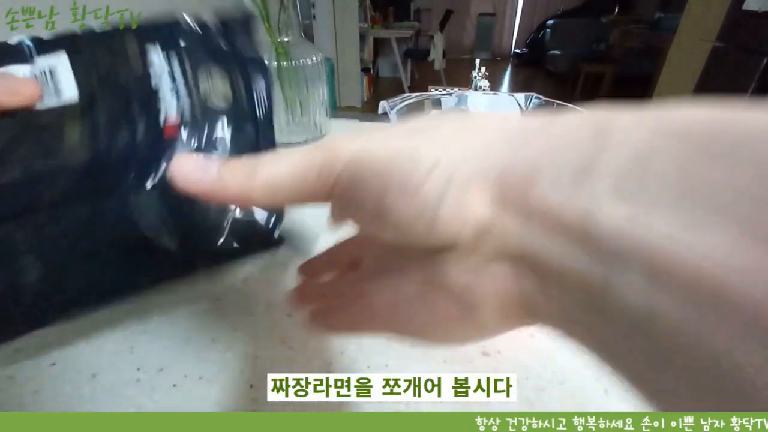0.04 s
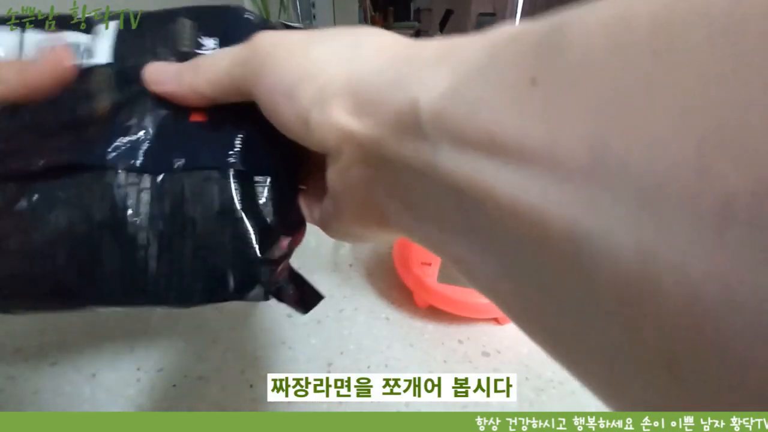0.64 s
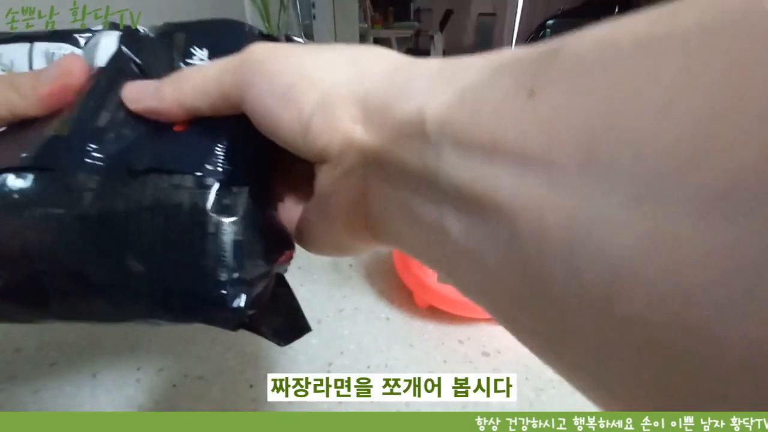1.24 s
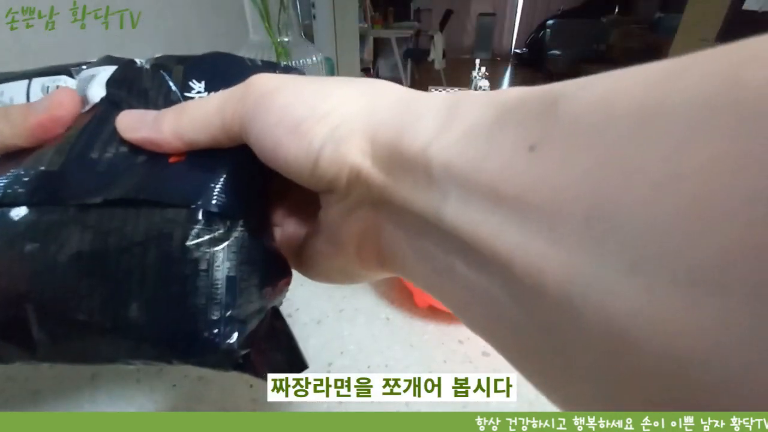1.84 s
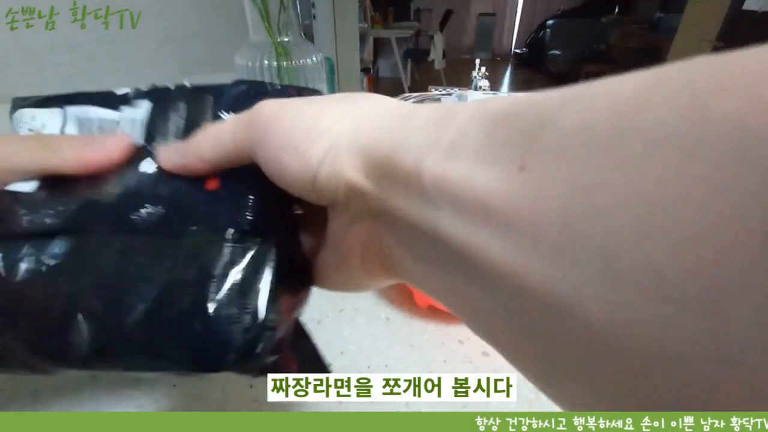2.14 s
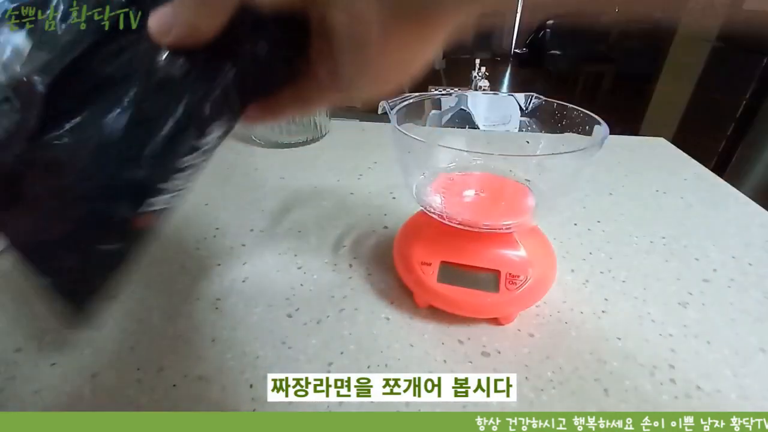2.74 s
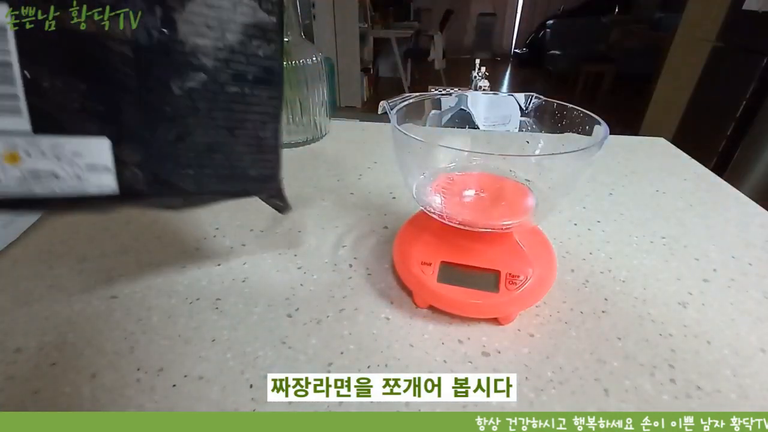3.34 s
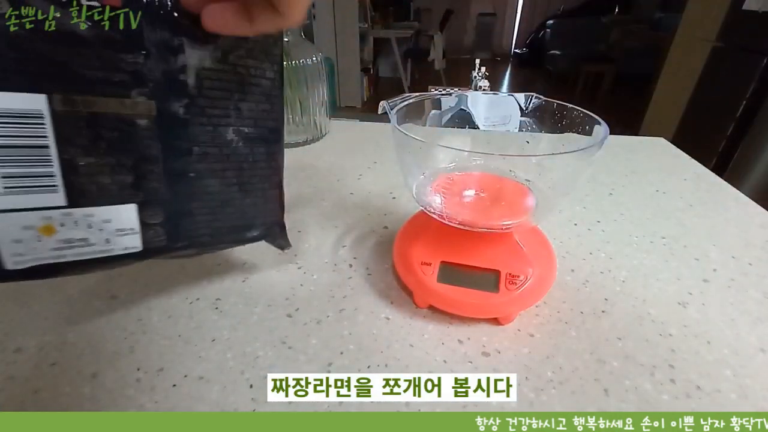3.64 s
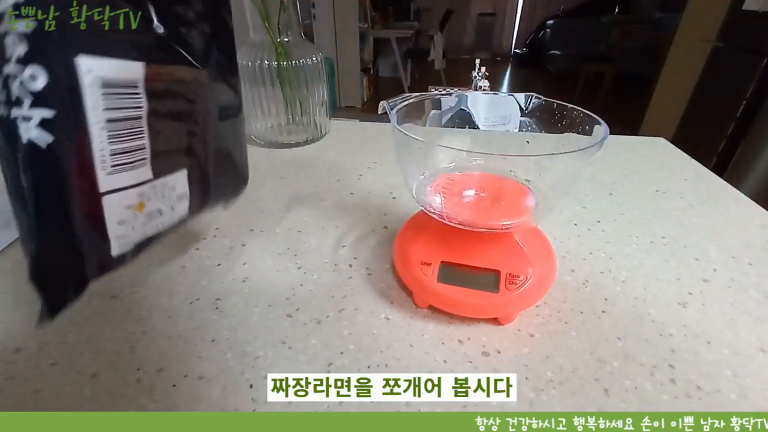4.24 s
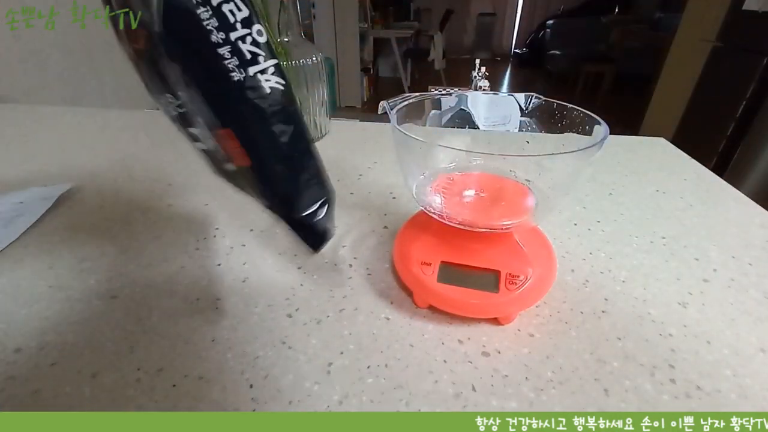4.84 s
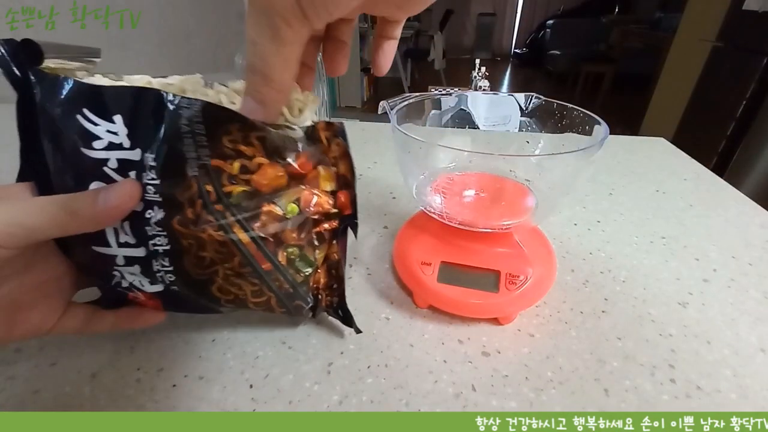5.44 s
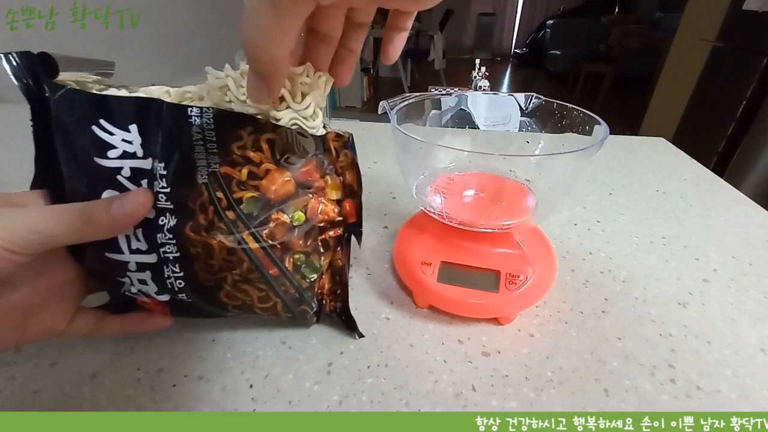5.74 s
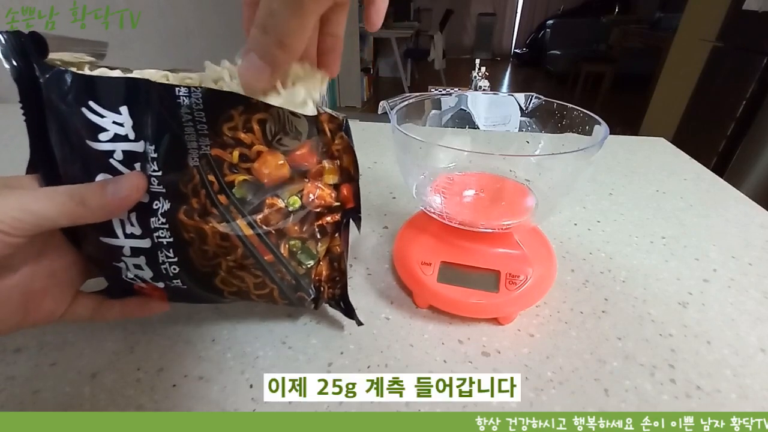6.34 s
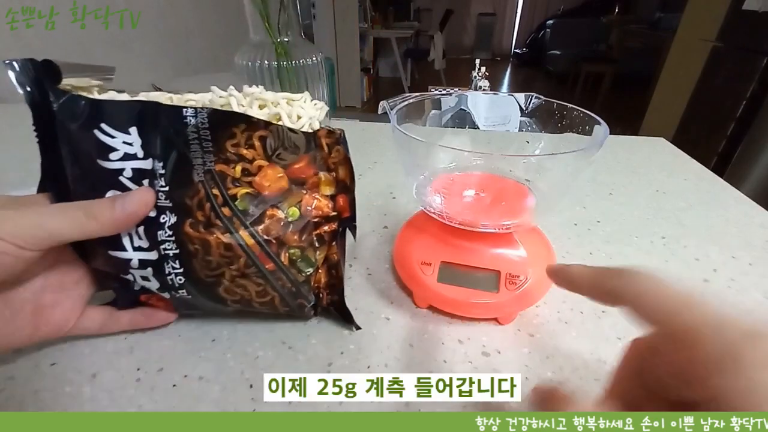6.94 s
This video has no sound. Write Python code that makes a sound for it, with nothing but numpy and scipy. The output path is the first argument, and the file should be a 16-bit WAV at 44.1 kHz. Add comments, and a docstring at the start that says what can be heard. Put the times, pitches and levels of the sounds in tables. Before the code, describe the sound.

Close, sharp plastic crackling and dull knocks as dry noodles are crushed in their packet, followed by faint rustling of picking fingers.

```python
"""Crushing a packet of dry noodles

Close up, hands squeeze a plastic packet to break the noodle block inside, then turn it over. Creases in
the film buckle with single snaps over a dense rustle, and the block gives way with dull knocks. Then the
scene changes: fingers pick softly at the noodles in the open packet. A small, quiet kitchen answers."""
import sys
import numpy as np
from scipy import signal
from scipy.fft import rfft, irfft
from scipy.io import wavfile
from scipy.ndimage import uniform_filter1d

SR = 44100
rng = np.random.default_rng(int(sys.argv[2]) if len(sys.argv) > 2 else 0)


def file_out(sig):
    """Save sig as 16-bit WAV at sys.argv[1]."""
    # one column per channel
    cols = np.atleast_2d(sig).T
    # limit, then scale
    lim = np.clip(cols, -1, 1)
    pcm = np.round(lim * 32767).astype(np.int16)
    wavfile.write(sys.argv[1], SR, pcm)


N = 307818
TIME = np.arange(N) / SR
SNAP_TIME = (np.arange(1400) - 132) / SR   # seconds around the instant a crease flips
SCENE_CHANGE_S = 5.087   # crushing ends, picking begins


def from_db(db):
    return 10 ** (np.asarray(db) / 20)


def band(x, low_hz, high_hz, order=2):
    """Butterworth band-pass."""
    edges_hz = [low_hz, min(high_hz, SR / 2.1)]
    return signal.sosfilt(signal.butter(order, edges_hz, "band", fs=SR, output="sos"), x)


def colour(x, peaks):
    """A chain of resonances and dips."""
    for hz, width_hz, db in peaks:
        x = x + (from_db(db) - 1) * signal.lfilter(*signal.iirpeak(hz, hz / width_hz, fs=SR), x)
    return x


def drift(moves_per_s):
    """A random wander with a spread of about 1."""
    knots = rng.standard_normal(int(moves_per_s * N / SR) + 2)
    return np.interp(TIME * moves_per_s, np.arange(len(knots)), knots)


def add(out, sound, at):
    """Mix a short sound in, starting at a sample."""
    room_left = out[..., max(at, 0):][..., :sound.shape[-1]]
    room_left += sound[..., :room_left.shape[-1]]


def unit_level(x, span_s=.005):
    """Give each short stereo sound the energy of rms 1 held for span_s."""
    return x / np.sqrt(np.mean(np.sum(x ** 2, -1), -1) / (span_s * SR) + 1e-20)[:, None, None]


def stereo_delay(sounds, lag):
    """Each sound reaches the left side lag samples after the right; a negative lag leads."""
    source = np.arange(len(SNAP_TIME)) - np.maximum(lag[:, None] * [1, -1], 0)[..., None]
    return np.take_along_axis(sounds, np.maximum(source, 0), -1) * (source >= 0)


def buckle(count, spike, fall_s, flutter_db, width):
    """A crease creeps, flips, shivers and flutters out; the shiver differs between left and right."""
    noise = rng.standard_normal((count, 3, len(SNAP_TIME)))
    shiver = noise[:, :1] + width * noise[:, 1:]
    flip = spike * rng.choice([-1, 1], (count, 1, 1)) * (SNAP_TIME == 0)
    from_flip_s = np.abs(SNAP_TIME)
    creep = .33 * np.exp(-from_flip_s / .0014)
    flutter = from_db(flutter_db) * np.exp(-from_flip_s / .004)
    fall = np.exp(-from_flip_s / (fall_s * from_db(rng.normal(0, 1.5, (count, 1, 1)))))
    return flip + shiver * np.where(SNAP_TIME < 0, creep, fall + flutter)


def film_ring(hz, ring_cycles):
    """Film rings for a few cycles, damped by the hands, and sags in pitch as its tension lets go."""
    t = np.maximum(SNAP_TIME, 0)
    cycles = hz[:, None, None] * t * (1 + .1 * np.exp(-t / .0015))
    swell = (1 - np.exp(-2 * cycles)) * np.exp(-cycles / ring_cycles - t / .0035)
    tone = band(np.sin(2 * np.pi * cycles) * swell, 380, 13000)
    return unit_level(tone * np.ones((2, 1)))


def snap_sounds(facet_hz, ring_db, sharp_db):
    """Three layers per snap: the packet's thump, the flap of a facet of film, the crack of the crease."""
    count = len(facet_hz)
    lag = np.round(rng.normal(3, 3.5, count)).astype(int)
    thump = buckle(count, spike=5.8, fall_s=.0014, flutter_db=-15, width=.62)
    flap = buckle(count, spike=2, fall_s=.0013, flutter_db=-15, width=.6)
    crack = buckle(count, spike=1.6, fall_s=.0012, flutter_db=-17, width=.99)
    thump = band(band(thump, 180, 520, order=1), 38, 670)
    flap = unit_level(band(flap, 500, 3400)) + from_db(ring_db) * film_ring(facet_hz, ring_cycles=4)
    crease_hz = np.exp(rng.uniform(np.log(4200), np.log(14000), count))
    # some creases flip more sharply than others, which lifts the top of the crack
    sharpness = from_db(sharp_db + rng.normal(0, 2.6, (count, 1, 1)))
    crack = crack + sharpness * band(crack, 10000, 19000, order=1)
    crack = unit_level(band(crack, 3800, 19000)) + from_db(-9) * film_ring(crease_hz, ring_cycles=5)
    return np.stack([unit_level(stereo_delay(part, lag)) for part in (thump, flap, crack)], 1)


def grip_levels(attack_s=.012, settle_db_per_s=170):
    """Thump, flap and crack envelopes in dB: each swells as the fingers close, holds, then settles."""
    # the hands squeeze, turn and pick at the packet: t/s, length/s, thump/dB, flap/dB, crack/dB
    grips = [(0, 0.15, -57, -49, -52.5), (0.209, 0.024, -47, -42, -54), (0.282, 0.016, -40, -32, -35.5),
             (0.364, 0.11, -43, -36, -38), (0.573, 0.063, -34.5, -29.5, -30), (0.671, 0.2, -39, -30, -36.5),
             (0.932, 0.045, -36, -29, -31), (1.034, 0.13, -40, -32, -35), (1.181, 0.14, -52, -39, -40.5),
             (1.393, 0.017, -66, -47.5, -46), (1.482, 0.097, -52, -43.5, -43.5),
             (1.674, 0.021, -55, -37, -36), (1.778, 0.074, -60, -45.5, -47.5),
             (1.92, 0.035, -34, -26.5, -30.5), (2.018, 0.11, -49, -36, -39),
             (2.064, 0.059, -40, -29.5, -29.5), (2.171, 0.086, -40, -31, -34.5),
             (2.317, 0.1, -39, -31, -31.5), (2.533, 0.12, -44.5, -32, -34), (2.681, 0.12, -44, -37, -35.5),
             (2.852, 0.072, -47, -41, -43.5), (3.043, 0.061, -37, -29, -31), (3.184, 0.11, -45, -39, -53),
             (3.311, 0.015, -36, -29, -31.5), (3.376, 0.093, -44.5, -37, -39.5),
             (3.511, 0.069, -46, -40, -52), (3.576, 0.055, -46, -34, -35), (3.685, 0.1, -37.5, -31, -32.5),
             (3.813, 0.092, -37, -31, -30.5), (3.933, 0.082, -47, -38, -42.5),
             (4.053, 0.081, -41, -33, -30), (4.17, 0.044, -52, -44, -51), (4.282, 0.14, -50, -43, -46),
             (4.419, 0.031, -42, -33, -28.5), (4.488, 0.12, -42, -34, -35.5),
             (4.702, 0.1, -51.5, -38, -34.5), (4.795, 0.15, -43.5, -32, -32.5),
             (5.003, 0.049, -52, -38, -33.5), (5.087, 0.22, -74, -63, -64), (5.351, 0.093, -57.5, -53, -53),
             (5.499, 0.126, -54.5, -53, -52), (5.642, 0.17, -64, -59, -58.5),
             (5.823, 0.19, -54.5, -53.5, -55.5), (6.051, 0.063, -56.5, -54, -58),
             (6.168, 0.12, -66, -59.5, -62), (6.332, 0.082, -59.5, -55.5, -56.5),
             (6.889, 0.053, -75, -74, -72)]
    t, power = TIME[::40], 1e-12
    for s, length_s, *levels_db in grips:
        swell = np.clip((t - s) / attack_s, 0, 1)
        settle = from_db(-settle_db_per_s * np.maximum(t - s - length_s, 0))
        same_scene = (t < SCENE_CHANGE_S) == (s + length_s / 2 < SCENE_CHANGE_S)
        power = power + np.outer(from_db(levels_db), swell * settle * same_scene) ** 2
    return [np.interp(TIME, t, 10 * np.log10(part)) for part in power]


def rustle(base_per_s, size_spread_db, clumping_db, thump_db, flap_db, crack_db, bank_size=200):
    """Tiny creases give way in clumps: bare film ticks sparsely, a crumbling block crackles densely."""
    levels_db = grip_levels()
    crumble_db = levels_db[0] - levels_db[1] + 10   # more thump against flap means more crumbling
    density = np.clip(from_db(.8 * crumble_db), .12, 1.5)
    per_s = base_per_s * density * from_db(clumping_db * drift(60))
    starts = np.flatnonzero(rng.random(N) < per_s / SR)
    sizes_db = size_spread_db * np.minimum(rng.exponential(1, (len(starts), 1)), 4)
    sizes_db = sizes_db + rng.normal(0, 3, (len(starts), 3))
    bank = snap_sounds(np.geomspace(480, 4200, bank_size), ring_db=-4.5, sharp_db=-19.5)
    # a fold runs over facets of like size, so neighbouring ticks are close in pitch
    fold = .3 * drift(moves_per_s=25)[starts]
    facets = (fold + .09 * rng.standard_normal(len(starts))) % 1
    crowd = np.zeros((3, 2, N))
    for at, size, which in zip(starts, from_db(sizes_db), (facets * bank_size).astype(int)):
        add(crowd, bank[which] * size[:, None, None], at + round(SNAP_TIME[0] * SR))
    # even out the crowd so that the grips shape its loudness
    crowd /= np.sqrt(uniform_filter1d(np.mean(crowd ** 2, 1, keepdims=True), size=1800) + .05)
    thump, flap, crack = [part * from_db(db) for part, db in zip(crowd, levels_db)]
    lean_right = np.array([[-1], [1]])
    return (thump * from_db(thump_db + 1.1 * lean_right)
            + flap * from_db(flap_db + .4 * lean_right)
            + crack * from_db(crack_db + .6 * lean_right))


def room_tone(mid_db, narrow_below_hz):
    """The still air of the kitchen: steady noise, narrower in the bass."""
    # spectrum of the air: f/Hz, relative level/dB
    air_spectrum = [(18, -56), (30, -31.5), (81, -5.5), (130, -12.5), (182, -5), (369, -6), (432, -10.5),
                    (492, -13.5), (747, -16), (1330, -27), (3590, -32.5), (5450, -31.5), (15500, -26.5)]
    points_hz, points_db = np.transpose(air_spectrum)
    hz = np.maximum(np.fft.rfftfreq(N, 1 / SR), 1)
    shape = from_db(np.interp(np.log(hz), np.log(points_hz), points_db))
    mid, side = rfft(rng.standard_normal((2, N))) * shape
    side = side * np.sqrt(np.clip(hz / narrow_below_hz, .15, 1))
    return from_db(mid_db) * irfft(mid + side * [[1], [-1]], N) / np.std(irfft(mid, N))


def kitchen_echo(x, t60_s, treble_t60_s, bass_db, treble_db):
    """Diffuse echo of the walls; the treble dies first."""
    t = np.arange(SR // 2) / SR
    noise = rng.standard_normal((2, len(t))) * np.clip((t - .003) / .0019, 0, 1)
    decay = from_db(-60 * t / t60_s)
    bass = band(noise, 120, 3000) * decay
    treble = band(noise[::-1], 2600, 15000, order=1) * from_db(-60 * t / treble_t60_s)
    echo = (from_db(bass_db) * bass + from_db(treble_db) * treble) / np.sqrt(np.sum(decay ** 2))
    return signal.fftconvolve(x, echo, axes=-1)[:, :N]


def loud_snaps(thump_db, flap_db, crack_db):
    """Single snaps above the rustle; a facet that flips with little crack pops at a clearer pitch."""
    # creases and noodle strands giving way:
    # t/s, thump/dB, flap/dB, crack/dB, facet f/Hz, left minus right/dB
    snaps = [(0.022, -60, -42.5, -33.5, 1500, 0), (0.072, -50, -39, -33.5, 4170, -1),
             (0.151, -53, -40.5, -30.5, 2180, -7.5), (0.225, -54, -52, -34, 1420, -3),
             (0.244, -52, -39.5, -43, 1340, -7), (0.294, -45, -28, -38, 1800, -2),
             (0.303, -36, -31, -37, 1790, -1), (0.388, -42, -35, -38, 1870, -8),
             (0.402, -41, -30.5, -27, 1510, 1), (0.41, -43, -26, -31, 4300, -3),
             (0.429, -34.5, -26.5, -29, 1620, -5), (0.499, -45, -37, -25, 1920, -3),
             (0.552, -44, -40, -59, 1248, -1), (0.621, -37, -23.5, -20, 1800, 1.5),
             (0.658, -41, -27, -30, 2800, 1), (0.702, -24, -23.5, -22, 1621, -0.5),
             (0.748, -36, -23.5, -19.5, 1900, -3), (0.797, -30.5, -19, -21, 1940, -3),
             (0.858, -27, -17, -20.5, 1290, -1.5), (0.928, -29.5, -23.5, -25, 1390, -4.5),
             (0.998, -17, -15.5, -15.5, 1240, -1), (1.049, -28, -25.5, -30, 1810, -2),
             (1.063, -35, -24.5, -38, 3118, 3), (1.067, -33, -24.5, -25.5, 2020, -3),
             (1.083, -38, -19, -25.5, 1920, -1), (1.125, -48, -46, -29.5, 870, 5),
             (1.139, -31, -21.5, -32, 615, 0.5), (1.157, -35.5, -24.5, -27, 2930, -10),
             (1.225, -55, -28, -23.5, 2100, -2), (1.261, -58, -36, -39, 2080, 1.5),
             (1.275, -53, -24.5, -27, 677, -3), (1.295, -58, -30.5, -25.5, 720, -1),
             (1.318, -50.5, -26.5, -30, 1300, 1), (1.404, -61, -29.5, -31, 1330, -2.5),
             (1.451, -70, -38.5, -35, 1940, -2), (1.497, -62, -24, -25, 3787, -1),
             (1.521, -48.5, -23, -21.5, 1340, -5), (1.546, -53, -35, -29, 1790, 2),
             (1.558, -51, -38, -39, 1731, 3), (1.566, -33, -22.5, -29.5, 573, -5),
             (1.621, -60, -41, -35.5, 1960, -1), (1.646, -67, -32, -44, 1890, 2.5),
             (1.687, -61.5, -29.5, -25, 2640, 3), (1.69, -54.5, -23.5, -23, 2770, 1),
             (1.714, -50.5, -27.5, -30.5, 2714, 0.5), (1.751, -52.5, -24, -39, 2620, 0.5),
             (1.784, -57, -32, -36, 3000, 0.5), (1.797, -62, -28, -42.5, 2976, -1.5),
             (1.804, -66.5, -36, -33, 1970, -6), (1.81, -59.5, -31.5, -29.5, 2020, 5),
             (1.83, -59, -37.5, -44, 970, -2), (1.897, -55, -24.5, -28.5, 2560, 1.5),
             (1.907, -49.5, -32.5, -25, 1274, -1.5), (1.922, -19, -12, -14.5, 2007, -2),
             (2.145, -34, -28, -48, 2098, -1), (2.161, -31.5, -24, -23, 1898, -2.5),
             (2.228, -39, -30, -26.5, 1346, -3), (2.245, -46, -27, -22, 1820, 2),
             (2.293, -43, -32, -21.5, 2370, -3), (2.312, -50, -33, -30, 3510, -6),
             (2.33, -50, -29, -22, 2140, 1), (2.45, -37.5, -30, -31, 1985, -1),
             (2.53, -40, -38, -29, 2890, -4), (2.566, -62, -27.5, -34, 1310, -2),
             (2.608, -38, -28, -22, 2680, -4), (2.698, -37, -33.5, -35, 1393, -8),
             (2.773, -47.5, -38, -27, 1620, 5), (2.801, -49.5, -30.5, -24, 1430, -3.5),
             (2.849, -45, -35, -33, 1336, -8), (2.862, -46, -34, -35, 1871, 1),
             (2.936, -52, -46, -31.5, 1244, -4), (3.019, -51, -35.5, -37, 1249, -16),
             (3.104, -33, -28, -28, 2257, -9), (3.203, -52, -38, -31, 1200, -6),
             (3.225, -47.5, -32.5, -40.5, 1080, -4), (3.254, -41, -34, -39, 1270, -3),
             (3.316, -37, -40, -27, 2015, -2), (3.324, -30, -33.5, -28, 1801, 1),
             (3.332, -43, -28, -24, 3400, -2), (3.355, -57, -28, -23.5, 1260, -3),
             (3.401, -47, -28.5, -17.5, 3520, -0.5), (3.429, -50, -27.5, -30.5, 4316, -2),
             (3.532, -36, -33.5, -45, 2320, -4), (3.613, -30, -22, -25.5, 1901, -3),
             (3.709, -36, -25, -22.5, 3113, -2), (3.736, -39, -20.5, -18.5, 509.2, 0),
             (3.771, -31, -23.5, -24, 610, -2), (3.794, -38, -29, -19, 686, -3),
             (3.836, -32, -27.5, -26, 1887, -4), (3.893, -28.5, -23.5, -22.5, 1092, -2.5),
             (3.921, -50, -36, -22, 4290, -1), (3.931, -48, -48, -17.5, 3850, -4),
             (3.947, -40.5, -23.5, -21.5, 3838, 2), (3.982, -44.5, -33.5, -33.5, 520, 4),
             (4.016, -38.5, -26, -22, 2580, -3), (4.046, -53, -27, -28, 1705, 6),
             (4.057, -37.5, -32, -19.5, 1430, -0.5), (4.125, -45, -21, -19, 3873, 0),
             (4.15, -47.5, -38.5, -16.5, 4100, 5), (4.174, -53, -31, -48, 1736, 2.5),
             (4.218, -43, -30.5, -35, 584.9, 8), (4.233, -52, -32, -28.5, 3729, -5.5),
             (4.269, -63, -62, -25, 4200, 0), (4.32, -46, -35.5, -41, 1250, 5),
             (4.344, -59, -26.5, -35.5, 3379, 3), (4.379, -51, -31, -33, 1380, 0),
             (4.425, -43.5, -35.5, -23.5, 4340, 0), (4.436, -43, -41, -21.5, 4177, 1),
             (4.454, -48, -28.5, -35, 3410, 7.5), (4.494, -38, -31, -44, 1860, 3),
             (4.546, -31, -23, -22.5, 3310, 0), (4.585, -43, -29, -26, 1130, -3),
             (4.615, -49, -25, -29.5, 4231, -3.5), (4.686, -65, -35.5, -31, 1800, 0),
             (4.709, -54, -32, -29, 1256, -7.5), (4.746, -43, -27, -24, 698.8, -2),
             (4.79, -51, -34, -24.5, 3350, -4), (4.825, -28.5, -26, -23, 1300, -1),
             (4.869, -34.5, -27, -30, 1710, 2), (4.892, -49, -22, -31, 3209, 2),
             (4.9, -50, -25.5, -20, 3332, -5), (4.929, -27.5, -24, -24, 1960, -0.5),
             (5.022, -64.5, -30, -23, 3160, -3), (5.179, -62, -62, -43.5, 542.5, -1),
             (5.253, -68, -51.5, -60, 1716, -8), (5.364, -40.5, -39, -29.5, 3750, 2),
             (5.427, -58, -49, -45, 2210, 9), (5.446, -64, -67, -44, 2230, 3),
             (5.462, -58, -50, -63, 520, 7), (5.484, -61, -53, -50, 3640, -1),
             (5.578, -57, -50, -50, 4160, -1), (5.619, -53, -56.5, -44, 530.4, 1),
             (5.686, -58, -46, -48, 554.6, 3), (5.867, -60, -47, -52, 694, -1),
             (5.885, -66, -50, -57, 1770, 1), (5.92, -58, -47, -47, 4196, -3),
             (6.074, -62, -46.5, -52, 590, 1), (6.421, -52, -50, -47, 498.7, 5),
             (6.905, -72, -68, -56.5, 4310, -2)]
    rows, out = np.array(snaps), np.zeros((2, N))
    flap_over_crack_db = rows[:, 2] - rows[:, 3]
    ring_db = np.clip(.45 * flap_over_crack_db - 2.5, -6, 3)
    sounds = snap_sounds(facet_hz=rows[:, 4], ring_db=ring_db[:, None, None], sharp_db=-6)
    for (s, *levels_db, _, pan_db), layers in zip(rows, sounds):
        gains = from_db(np.add(levels_db, [thump_db, flap_db, crack_db]))
        pan = from_db([[pan_db / 2], [-pan_db / 2]])
        add(out, np.tensordot(gains, layers, 1) * pan, round((s + SNAP_TIME[0]) * SR))
    return out


def block_knocks(body_hz, fall_s, gain_db):
    """The block gives way and pushes the air in the packet: a low, heavily damped swing."""
    # dull knocks of the shifting noodle block: t/s, relative peak/dB
    knocks = [(0.437, -38), (0.609, -23), (0.648, -29), (0.694, -26.5), (0.801, -35), (0.999, -36),
              (2.572, -34), (2.644, -32), (3.073, -34), (3.114, -30), (5.978, -41)]
    t, out = np.arange(SR // 8) / SR, np.zeros((2, N))
    envelope = t / fall_s * np.exp(1 - t / fall_s)
    for s, db in knocks:
        hz = body_hz * from_db(rng.normal(0, 1))
        phase = rng.normal(0, .39, (2, 1))   # left and right swing out of step
        swing = np.sin(2 * np.pi * hz * t + phase) * envelope
        add(out, from_db(db + gain_db) * swing, round(s * SR))
    return out * from_db([[-1], [1]])


def open_packet(x):
    """The open packet, with fingers in its mouth, colours the picking."""
    # its resonances and dips: f/Hz, width/Hz, gain/dB
    packet_peaks = [(160, 160, 4), (304, 33, -5), (530, 92, 6), (1060, 1100, 0), (2230, 72, 4),
                    (5200, 1700, 3), (13300, 2900, -1.5)]
    return colour(x, packet_peaks)


def scene():
    """Crushing, then picking, over room tone; the crushing's echo stops dead at the scene change."""
    packet = loud_snaps(thump_db=0, flap_db=-1, crack_db=.5)
    packet += block_knocks(body_hz=106, fall_s=.0048, gain_db=-5)
    packet += rustle(base_per_s=750, size_spread_db=3, clumping_db=4,
                     thump_db=-1.5, flap_db=-2, crack_db=-.15)
    first_scene = TIME < SCENE_CHANGE_S
    crushing = packet * first_scene
    picking = open_packet(packet) * ~first_scene
    for part in (crushing, picking):
        part += kitchen_echo(part, t60_s=.089, treble_t60_s=.066, bass_db=-8.5, treble_db=-8)
    return crushing * first_scene + picking + room_tone(mid_db=-73, narrow_below_hz=1600)


def record(dry):
    """Close-up colour, a brief level dip at the scene change, a peak ceiling and a steep top cut."""
    # colour of packet, worktop and microphone ports: f/Hz, width/Hz, gain/dB
    close_peaks = [(98, 47, 0), (223, 67, 2.5), (520, 58, 1), (906, 130, -2.5), (1210, 390, 2.5),
                   (1840, 280, 2), (2467, 1300, -1.5), (3920, 3800, 2.5), (7230, 1500, 3.5),
                   (8480, 3880, -6), (14300, 2300, -3), (14970, 490, -20.5)]
    # the left port's own colour: f/Hz, width/Hz, gain/dB
    left_peaks = [(520, 430, -0.5), (1940, 780, 1.77)]
    left, right = colour(dry, close_peaks)
    out = np.stack([colour(left, left_peaks), right])
    dip_db = -24 * np.exp(-((TIME - SCENE_CHANGE_S) / .011) ** 2)
    top_cut = signal.ellip(12, .1, 80, 15850, fs=SR, output="sos")
    return signal.sosfilt(top_cut, np.clip(out * from_db(dip_db), -.72, .72))


dry = scene()
out = record(dry)
file_out(out)
```